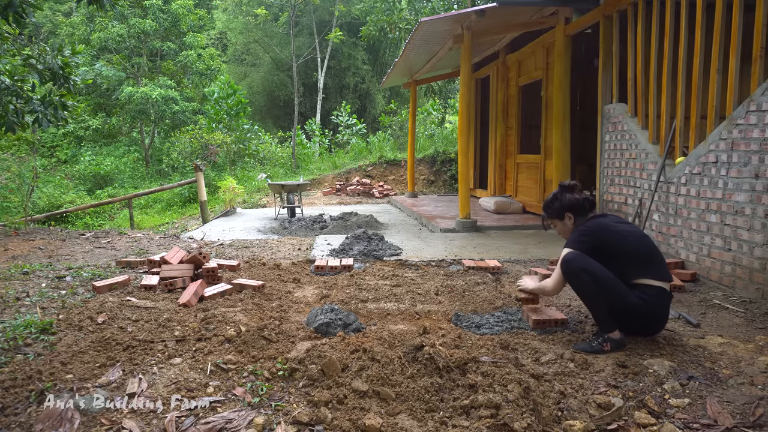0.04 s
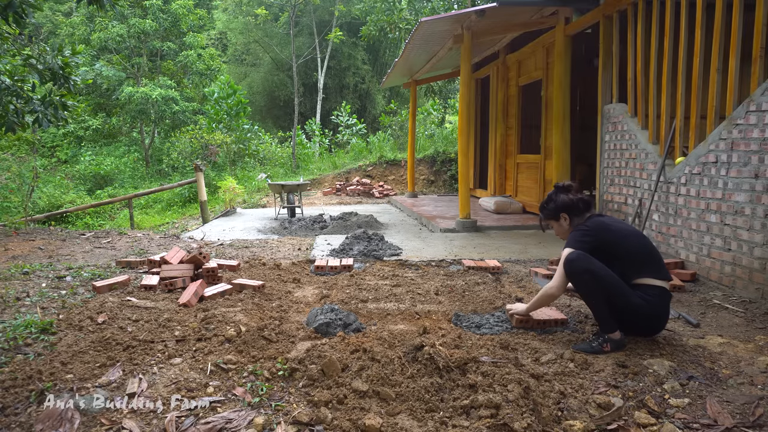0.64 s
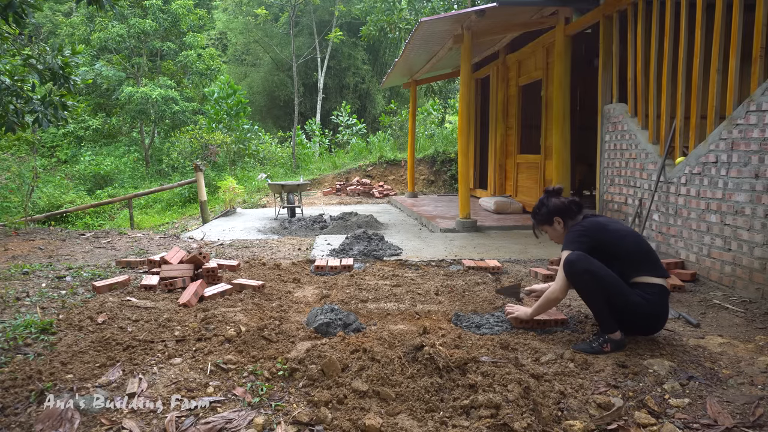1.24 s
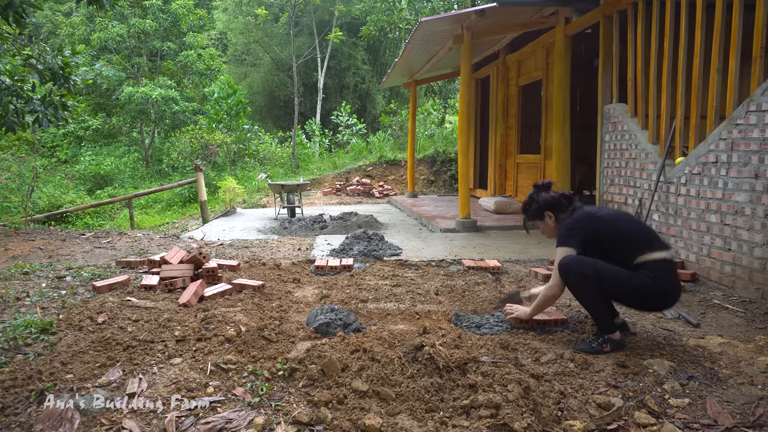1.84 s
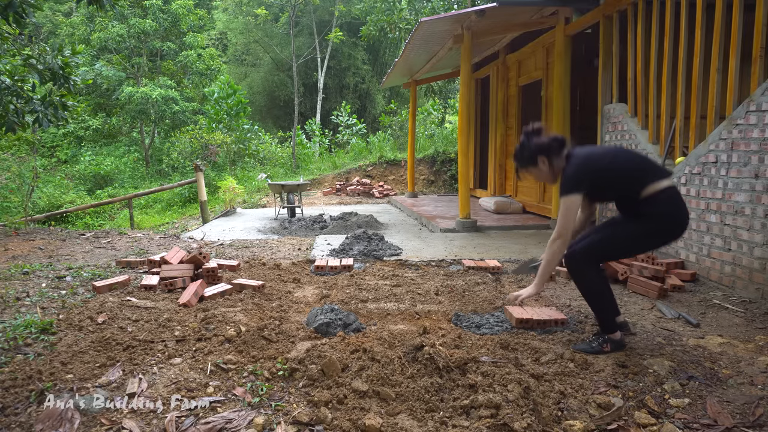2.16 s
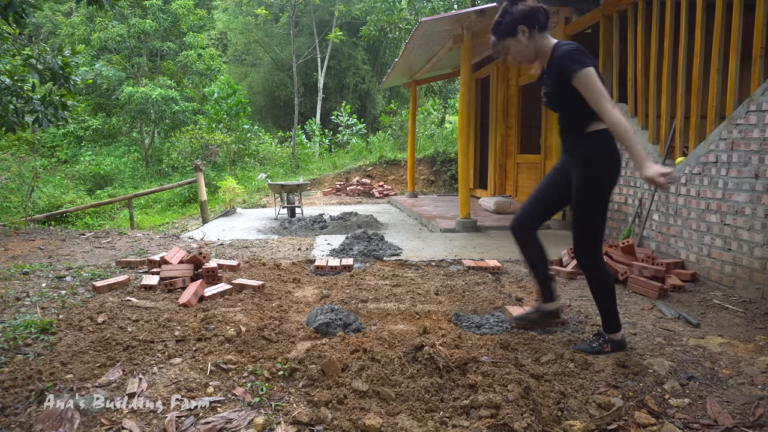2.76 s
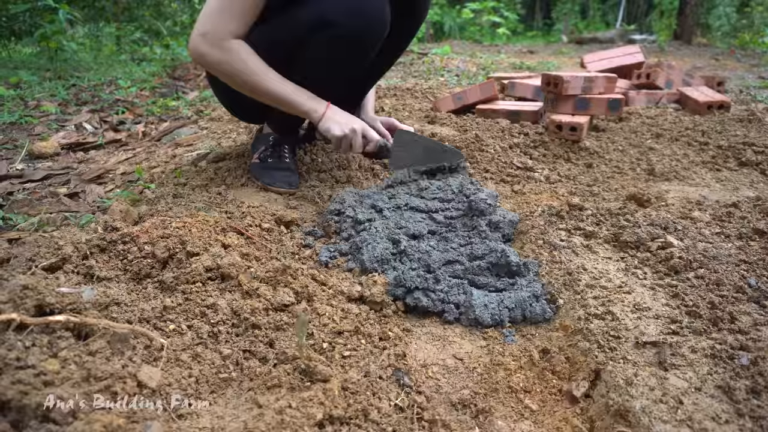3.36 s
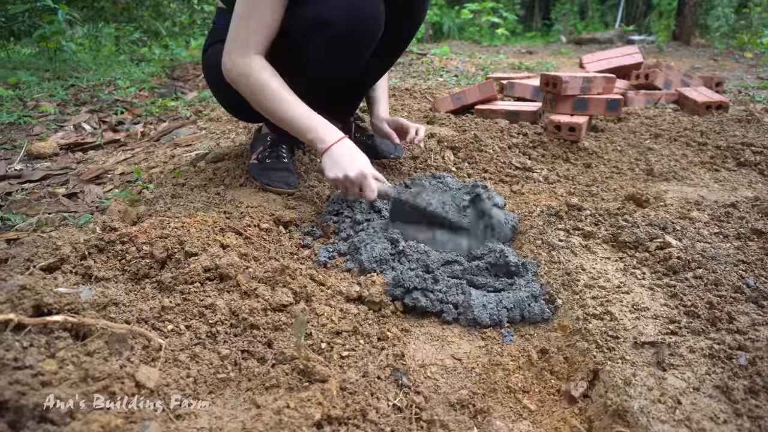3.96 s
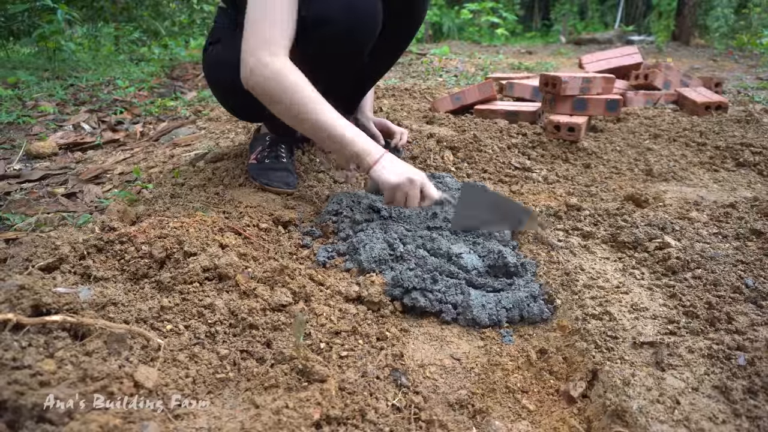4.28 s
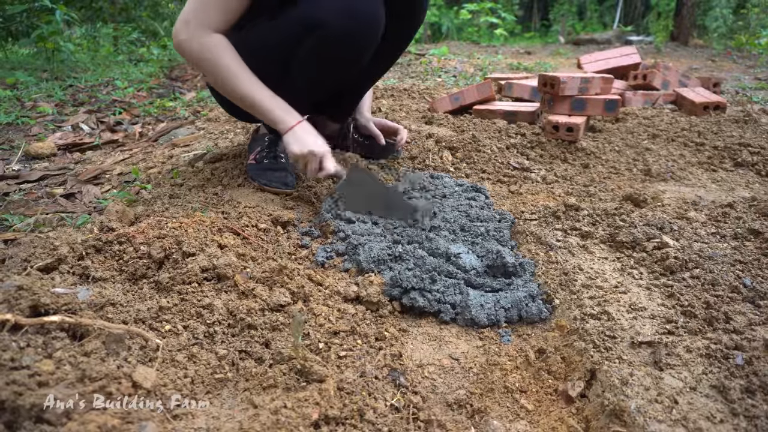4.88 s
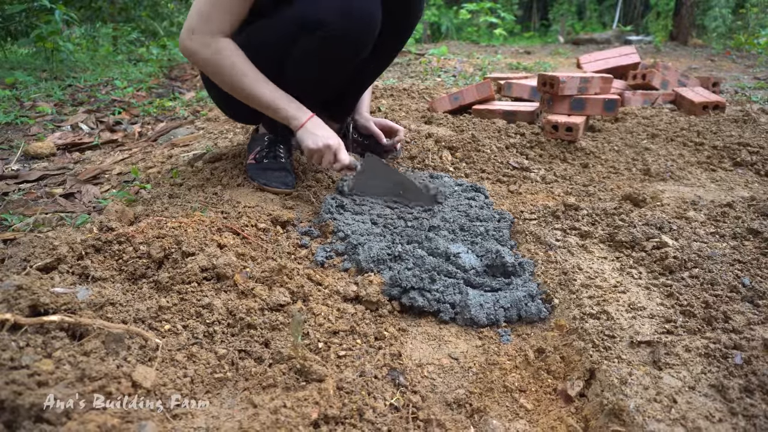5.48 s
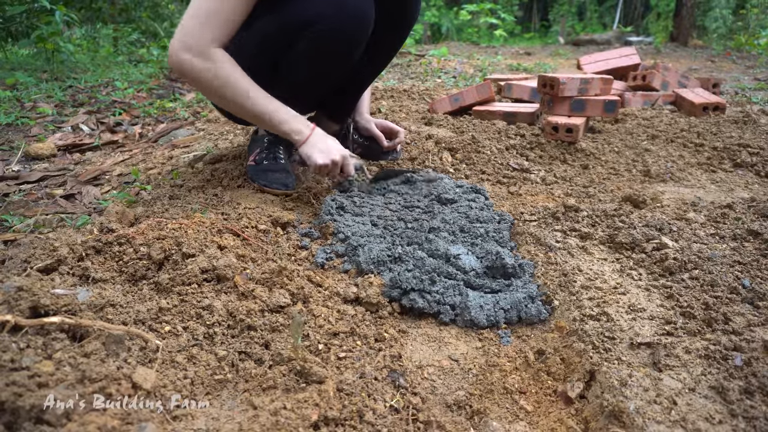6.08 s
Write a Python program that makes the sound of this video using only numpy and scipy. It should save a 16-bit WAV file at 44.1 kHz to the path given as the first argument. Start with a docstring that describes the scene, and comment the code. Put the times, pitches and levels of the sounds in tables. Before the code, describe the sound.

A trowel taps a ringing brick five times, then scrapes and slaps wet gritty mortar up close, over steady forest insects.

```python
"""A building yard in a forest. Five sharp taps seat a ringing brick in its mortar bed; a house wall
throws them back, and shoes crunch on soil. Then, closer, a steel trowel scoops wet gritty mortar, slaps
it down and slices through the heap, sand hissing along the blade and exciting its resonances.
Insects buzz steadily and a far bird whistles over a low rumble of open air."""
import sys
import numpy as np
from scipy import signal
from scipy.fft import rfft, irfft
from scipy.io import wavfile

SR = 44100
rng = np.random.default_rng(int(sys.argv[2]) if len(sys.argv) > 2 else 0)


def wav_out(sig):
    """Save sig, one row per channel (or a flat mono array), as 16-bit PCM at SR to the path in sys.argv[1]."""
    wavfile.write(sys.argv[1], SR, np.round(np.clip(np.atleast_2d(sig).T, -1, 1) * 32767).astype(np.int16))


N = 270774
TIME_S, FREQ_HZ = np.arange(N) / SR, np.fft.rfftfreq(N, 1 / SR)
CLOSE_S = 3.34  # from here the listener is beside the heap, nearer the trees


def gain_of(db):
    """Decibels to gain."""
    return 10 ** (np.asarray(db) / 20)


def unit_rms(x):
    """Scales to rms 1."""
    return x / np.sqrt(np.mean(x ** 2) + 1e-20)


def curve(points, hz=FREQ_HZ):
    """Interpolates a table over log frequency."""
    point_hz, value = np.transpose(points)
    return np.interp(np.log(hz + 1), np.log(point_hz + 1), value)


def add(mix, start_s, sound):
    """Mixes a sound in at start_s."""
    part = mix[..., round(start_s * SR):][..., :sound.shape[-1]]
    part += sound[..., :part.shape[-1]]


def stereo_noise(gain, correlation):
    """Coloured noise with a set left-right correlation."""
    left, other = rfft(rng.standard_normal((2, N)))
    correlation = np.clip(correlation, -1, 1)
    right = correlation * left + np.sqrt(1 - correlation ** 2) * other
    return unit_rms(irfft(np.array([left, right]) * gain, N))


def wander(hz):
    """Random drift of rms 1, low-passed at hz."""
    return unit_rms(irfft(rfft(rng.standard_normal(N)) / (1 + (FREQ_HZ / hz) ** 4), N))


def grit(spectrum, correlation, per_s, spread_db):
    """Ticks of uneven sand grains, each from a slightly different side."""
    ticks = (rng.random(N) < per_s / SR) * rng.standard_normal(N)
    ticks *= gain_of(spread_db * np.minimum(rng.exponential(1, N), 4))
    side = np.roll(ticks, 2) * rng.standard_normal(N) * np.sqrt((1 - correlation) / (1 + correlation))
    return unit_rms(irfft(rfft([ticks + side, ticks - side]) * gain_of(curve(spectrum)), N))


def bursts(rows):
    """Envelope of events with linear rise and exponential decay."""
    t, envelope = np.arange(SR // 2) / SR, np.zeros(N)
    for start_s, level_db, rise_s, t60_s in rows:
        decay_db = 60 * np.maximum(t - rise_s, 0) / t60_s
        add(envelope, start_s, np.minimum(t / rise_s, 1) * gain_of(level_db - decay_db))
    return envelope


def ring(modes, damping, rise_s, scatter_db):
    """Decaying modes; each blow hits a new spot, which reweights and slightly detunes them."""
    t = np.arange(SR // 4) / SR
    spot = rng.standard_normal((len(modes), 2))
    sound = np.zeros(len(t))
    for (pitch_hz, level_db, t60_s), (weight, detune) in zip(modes, spot):
        envelope = gain_of(level_db + scatter_db * weight - 60 * damping * t / t60_s)
        sound += envelope * np.sin(2 * np.pi * pitch_hz * (1 + 0.006 * detune) * (t - rise_s))
    return sound * np.minimum(t / rise_s, 1) ** 2


def resonate(x, pitch_hz, width_hz):
    """Steep unity-gain resonance that tracks pitch_hz."""
    carrier = np.exp(2j * np.pi * np.cumsum(pitch_hz) / SR)
    pole = np.exp(-np.pi * width_hz / SR)
    return 2 * (carrier * signal.lfilter([(1 - pole) ** 2], np.poly([pole, pole]), x / carrier)).real


def pan_right(x, treble_db, shape=FREQ_HZ ** 2 / (FREQ_HZ ** 2 + 650 ** 2)):
    """Tilts the treble to the right; the bass stays centred."""
    tilt_db = treble_db * shape
    return irfft(rfft(x) * gain_of(np.array([-tilt_db, tilt_db]) / 2), N)


# open air: freq_hz, density_db
AIR_SPECTRUM = [(20, -21), (45, -2), (70, 1.5), (115, 1), (160, -8), (260, -2.5), (400, -6.5), (600, -14),
                (1200, -15.5), (2700, -17.5), (3800, -22), (8700, -18), (12000, -24.5), (15700, -19.5)]
# left-right likeness of the air: freq_hz, correlation
AIR_CORRELATION = [(30, 1), (120, 0.98), (400, 0.81), (1500, 0.17), (4000, 0.37), (15000, 0.11)]
def air():
    """Low rumble of open air and a thin hiss of leaves."""
    level_db = -49 + 0.82 * wander(hz=1.54)
    return gain_of(level_db) * stereo_noise(gain_of(curve(AIR_SPECTRUM)), curve(AIR_CORRELATION))


# insect bands: centre_hz, width_hz, level_db, throb_hz, throb_depth
CHORUSES = [(5373, 920, -50, 31, 0.06), (7107, 570, -48.5, 98, 0.078), (7103, 96, -55.5, 13, 0.39),
            (6590, 230, -61.5, 100, 0.3), (10170, 1450, -60, 115, .2)]
def insects(near_trees_db=1.5):
    """Many far insects merge into narrow bands of buzz that throb unevenly."""
    out = np.zeros((2, N))
    for centre_hz, width_hz, level_db, throb_hz, throb_depth in CHORUSES:
        rate_hz = throb_hz * (1 + 0.13 * wander(hz=8.2))
        throb = 1 + throb_depth * np.sin(2 * np.pi * np.cumsum(rate_hz) / SR)
        band = (1 + 1.33 * ((FREQ_HZ - centre_hz) / width_hz) ** 2) ** -2
        out += gain_of(level_db + 1.1 * wander(hz=2.44)) * throb * stereo_noise(band, correlation=0.13)
    return out * gain_of(near_trees_db * (TIME_S > CLOSE_S))


# whistles: start_s, length_s, pitch_hz, level_db
BIRD_NOTES = [(0.296, 0.1, 2860, -60), (0.502, 0.15, 2860, -58), (0.561, 0.075, 2480, -54),
              (0.704, 0.14, 2870, -59), (0.917, 0.14, 2800, -59), (2.241, 0.14, 2760, -56),
              (2.499, 0.12, 2820, -62.5), (2.71, 0.17, 2740, -64), (3.025, 0.11, 2730, -59),
              (4.175, 0.11, 3000, -59), (5.082, 0.26, 2900, -61), (5.084, .13, 1300, -53.5)]
def bird(width_ratio=0.044):
    """Far whistles, blurred by the trees into narrow bands of noise."""
    out = np.zeros((2, N))
    for start_s, length_s, pitch_hz, level_db in BIRD_NOTES:
        size = round(length_s * SR)
        band = np.exp(-((FREQ_HZ - pitch_hz) / (width_ratio * pitch_hz)) ** 2)
        whistle = stereo_noise(band, correlation=0.7)[:, :size]
        add(out, start_s, gain_of(level_db) * signal.windows.tukey(size, 0.8) * whistle)
    return out


# soft knocks: start_s, level_db, rise_s, t60_s
BED_KNOCKS = [(.597, -39, 0.0055, 0.093), (2.003, -33, 0.0018, 0.062), (3.53, -48.5, 0.0036, 0.16),
              (3.775, -45, 0.003, 0.051)]
# dull knock: freq_hz, density_db
KNOCK_SPECTRUM = [(80, -17), (200, 4), (330, -1), (520, -13), (750, 3), (920, -5), (1100, -4), (1500, -24),
                  (2600, -23), (4000, -22), (12000, -34)]
def knocks():
    """Brick or blade bumps the wet bed, which stops the sound at once."""
    return bursts(BED_KNOCKS) * stereo_noise(gain_of(curve(KNOCK_SPECTRUM)), correlation=0.83)


# blows: start_s, ring_db, crack_db, thud_db, crack_t60_s, damping_ratio, bend_db, twist_db
BRICK_TAPS = [(1.185, -11.5, -23.5, -34, 0.027, 0.93, 2, 4), (1.3991, -10, -26, -34, 0.074, 1.26, -3.5, 0),
              (1.6067, -10, -28, -36, 0.04, 1.22, 1.5, -1),
              (1.8005, -13, -22, -28.5, 0.021, 0.86, 0.5, 4.5),
              (1.9636, -13, -15.5, -29.5, 0.047, 1.2, -1, 8)]
# brick resonances: pitch_hz, level_db, base_t60_s
BRICK_MODES = [(1426, -14, 0.082), (1520, -20, 0.037), (1654, -18.5, 0.051), (1776, -21, 0.05),
               (1940, -25, 0.07), (2380, -20, 0.055), (2406, -3, 0.035), (2460, -16, 0.057),
               (2590, -8.5, 0.034), (2666, -16, 0.053), (2970, -9, 0.019), (3240, -12, 0.021),
               (4020, -14.5, 0.017), (5200, -33, 0.0079)]
# mortar bed and ground: pitch_hz, level_db, t60_s
BED_MODES = [(156, -11, 0.051), (321, -6.5, 0.12), (384, -13.5, 0.048), (590, -3, 0.077),
             (704, -9.5, 0.044), (963, -4, 0.046), (1204, -0.5, 0.028)]
# gritty contact: freq_hz, density_db
CRACK_SPECTRUM = [(200, -45), (700, -10), (1200, -11), (1800, -2), (2600, 0.5), (3700, -5), (5100, -5.5),
                  (6200, -15.5), (10000, -16.5), (12000, -30), (16000, -36)]
# brick rocking as it settles: start_s, level_db, rise_s, t60_s
CLUNKS = [(1.8385, -23.5, 0.0017, 0.071), (2.004, -37, 0.0015, 0.046)]
# settling clunk: freq_hz, density_db
CLUNK_SPECTRUM = [(100, -36), (310, -10), (450, -22), (800, -13), (1000, -9.5), (1430, 3), (1600, -11),
                  (1880, 1), (2200, -13), (3500, -13), (4400, -11), (5300, -28), (14000, -40)]
def brick(bend_top_hz=1700, twist_top_hz=2100):
    """Each blow cracks on the gritty face, rings the brick and thuds into the bed, which damps it."""
    body, cracks = np.zeros(N), []
    for start_s, ring_db, crack_db, thud_db, crack_t60_s, damping, bend_db, twist_db in BRICK_TAPS:
        # central blows bend the brick, corner blows twist it
        modes = [(hz, db + bend_db * (hz < bend_top_hz) + twist_db * (bend_top_hz <= hz < twist_top_hz),
                  t60_s) for hz, db, t60_s in BRICK_MODES]
        add(body, start_s, gain_of(ring_db) * ring(modes, damping, rise_s=0.000906, scatter_db=1))
        add(body, start_s, gain_of(thud_db) * ring(BED_MODES, damping=1, rise_s=0.00088, scatter_db=1))
        cracks.append((start_s, crack_db, 0.0006, crack_t60_s))
    crack = bursts(cracks) * stereo_noise(gain_of(curve(CRACK_SPECTRUM)), correlation=0.95)
    clunk = bursts(CLUNKS) * stereo_noise(gain_of(curve(CLUNK_SPECTRUM)), correlation=0.96)
    direct = body + crack + clunk
    tail = yard_tail(direct + gain_of(-5.5) * crack, correlation=0.64)  # the crack spreads widest
    return pan_right(direct, treble_db=7.5) + echoes(direct) + gain_of(-7.5) * pan_right(tail, 3)


# early echoes: delay_s, left_gain, right_gain
REFLECTIONS = [(.0046, 0.04, 0.051), (.0078, 0.058, 0.098), (0.021, 0.029, 0.029), (.039, .07, .08),
               (.053, 0.066, 0.074)]
def echoes(x):
    """Ground and house wall return delayed copies."""
    out = np.zeros((2, N))
    for delay_s, left_gain, right_gain in REFLECTIONS:
        add(out, delay_s, x * np.array([[left_gain], [right_gain]]))
    return out


# reverberation: freq_hz, t60_s
YARD_DECAY = [(150, 0.12), (600, 0.51), (1500, 0.29), (2500, 0.35), (5000, 0.44), (12000, 0.28)]
def yard_tail(x, correlation):
    """Diffuse tail from porch, wall and trees; each band dies at its own rate."""
    hz, t, bands = signal.stft(stereo_noise(1, correlation)[:, :SR // 2], SR, nperseg=256)
    envelope = gain_of(-60 * t / curve(YARD_DECAY, hz)[:, None]) * np.minimum(t / 0.0035, 1)
    response = signal.istft(bands * envelope, SR, nperseg=256)[1]
    return signal.fftconvolve(x.mean(0)[None], response / np.linalg.norm(response[0]), axes=1)[:, :N]


# footfalls: start_s, level_db, rise_s, t60_s
FOOTFALLS = [(2.35, -58, 0.033, 0.21), (2.6, -64, 0.03, 0.32), (3.04, -50.5, 0.043, 0.91),
             (3.19, -57, 0.012, 0.32), (3.381, -53, 0.0015, 0.038)]
# loose earth: freq_hz, density_db
SOIL_SPECTRUM = [(100, -11), (300, 2), (700, 5), (1500, -1.5), (3000, -1), (8000, -10), (16000, -13)]
def steps():
    """Soil crunches softly under shoes."""
    return bursts(FOOTFALLS) * grit(SOIL_SPECTRUM, correlation=0.59, per_s=4300, spread_db=2)


def blade_speed(start_s, rise_s, end_s, release_t60_s, swell_db_per_s):
    """The blade picks up speed, pushes on through the mortar, then comes to rest."""
    attack = np.clip((TIME_S - start_s) / rise_s, 0, 1)
    pushed_s = np.clip(TIME_S, start_s + rise_s, end_s) - start_s - rise_s
    release_db = 60 * np.maximum(TIME_S - end_s, 0) / release_t60_s
    return attack * gain_of(swell_db_per_s * pushed_s - release_db)


# blade strokes, levels relative: start_s, rise_s, end_s, release_t60_s, hiss_db, swish_db, rasp_db,
# swell_db_per_s, pitch_hz, glide_hz_per_s
BLADE_STROKES = [(3.338, 0.012, 3.42, 0.42, -53, -60, -63, 4, 2220, 0),
                 (3.48, 0.065, 3.88, .3, -45, -56, -41.5, -24, 1980, -400),
                 (3.82, 0.16, 4.105, .16, -42.5, -41.5, -40, -38, 2130, 1000),
                 (4.385, 0.023, 4.53, 0.54, -39.5, -47.5, -39, -24, 2800, 0),
                 (4.81, .075, 5.09, .4, -39.5, -44, -40.5, -31, 2660, -800),
                 (5.13, 0.063, 5.2, 0.27, -58, -66, -61, -3, 2570, -6),
                 (5.373, 0.011, 5.46, 0.22, -42.5, -63, -31.5, -63, 2320, 1199),
                 (5.48, 0.029, 5.72, 0.24, -45, -55, -39.5, 2, 2820, -1600),
                 (5.75, .04, 5.85, 0.46, -47, -71, -48, -10, 2640, 0),
                 (5.979, 0.034, 6.18, .3, -43.5, -51, -40.5, -47, 2400, 0)]
# fine sand: freq_hz, density_db
SAND_SPECTRUM = [(200, -6.5), (600, -11.5), (1500, -1.5), (3000, 0.5), (4500, -1.5), (7000, -1),
                 (10000, 1.5), (13000, -2), (16000, -6.5)]
# coarse grains and spatter: freq_hz, density_db
SPATTER_SPECTRUM = [(150, -20), (500, -19), (1000, -2), (2000, -9), (2800, 0), (4000, -2), (6500, 2),
                    (8500, -7), (10500, -4.5), (12000, -11.5), (16000, -7.5)]
# wet mortar sliding on steel: freq_hz, density_db
SWISH_SPECTRUM = [(500, -40), (3000, -11), (4200, -3), (5500, 0), (6500, -4.5), (8500, -3), (16000, -25)]
# blade resonances: pitch_ratio, width_hz, level_db
BLADE_MODES = [(.5, 220, -4.5), (.72, 400, -7), (.89, 455, 1.5), (1.0, 440, 3), (1.14, 600, 2),
               (1.35, 700, -5), (2.1, 2500, -32)]
# blade catching on grit: start_s, level_db, rise_s, t60_s
GRIT_CATCHES = [(3.418, -44.5, .002, 0.023), (3.533, -49, 0.0022, .05), (3.856, -50, .003, 0.11),
                (4.412, -38, 0.0009, 0.036), (4.797, -44.5, .002, 0.091), (4.887, -34.5, 0.0018, 0.078),
                (5.400, -35.5, 0.002, 0.041), (5.527, -38, 0.003, 0.056), (5.6585, -32, 0.0015, 0.022)]
def scrape():
    """Sand hisses and mortar swishes along the blade; the steel rasps, its pitch shifting with depth."""
    hiss, swish, rasp, weighted_hz, total_speed = np.zeros((5, N))
    for (start_s, rise_s, end_s, release_t60_s, hiss_db, swish_db, rasp_db,
         swell_db_per_s, pitch_hz, glide_hz_per_s) in BLADE_STROKES:
        speed = blade_speed(start_s, rise_s, end_s, release_t60_s, swell_db_per_s) + 1e-9
        hiss += gain_of(hiss_db) * speed
        swish += gain_of(swish_db) * speed
        rasp += gain_of(rasp_db) * speed
        weighted_hz += speed * (pitch_hz + glide_hz_per_s * (np.clip(TIME_S, start_s, end_s) - start_s))
        total_speed += speed
    blade_hz = weighted_hz / total_speed
    stick_slip = gain_of(1.04 * wander(hz=70))
    fine = grit(SAND_SPECTRUM, correlation=0.75, per_s=12000, spread_db=-1.5)
    coarse = grit(SPATTER_SPECTRUM, correlation=1, per_s=350, spread_db=3.5)
    wet = grit(SWISH_SPECTRUM, correlation=0.96, per_s=3000, spread_db=0)
    mortar = stick_slip * (hiss * (gain_of(1.5) * fine + gain_of(-7) * coarse) + swish * wet)
    grains = grit(SAND_SPECTRUM, correlation=0.96, per_s=2000, spread_db=-0.2)
    steel = unit_rms(sum((-1) ** k * gain_of(level_db) * resonate(grains, ratio * blade_hz, width_hz)
                         for k, (ratio, width_hz, level_db) in enumerate(BLADE_MODES)))
    steel *= gain_of(-7.5) * rasp * stick_slip + bursts(GRIT_CATCHES)
    return pan_right(mortar, treble_db=0.5) + pan_right(steel, treble_db=4)


# loose sand, trickling or spurting: freq_hz, density_db
LOOSE_SAND_SPECTRUM = [(300, -19), (1500, -4.5), (4000, -5), (7000, 0), (10000, 0.5), (13000, 0),
                       (16000, -6)]
def crumbs():
    """Grains trickle off blade and heap, audible only up close."""
    ticks = grit(LOOSE_SAND_SPECTRUM, correlation=0.7, per_s=430, spread_db=5)
    return gain_of(-57.5) * (TIME_S > CLOSE_S) * ticks


# falling lumps: start_s, level_db
HEAP_SLUMPS = [(3.644, -41), (3.77, -39.5), (3.85, -43)]
# ground resonances: pitch_hz, level_db, base_t60_s
GROUND_MODES = [(47.7, 1.5, 0.2), (74.6, -7, 0.088)]
def slumps():
    """Lumps undercut by the blade slump with a low thud."""
    out = np.zeros(N)
    for start_s, level_db in HEAP_SLUMPS:
        thud = ring(GROUND_MODES, damping=0.95, rise_s=0.011, scatter_db=-2)
        add(out, start_s, gain_of(level_db) * thud)
    return out


# loaded trowel on the heap: pitch_hz, level_db, base_t60_s
TROWEL_MODES = [(261, -17.5, 0.082), (310, -13, 0.069), (410, -24, 0.042), (601, -6.5, 0.034),
                (1110, -11, 0.04), (1320, -8.5, 0.063), (1570, -12, 0.037), (2590, -7.5, 0.061)]
def impacts(rows, grains):
    """Each impact throws a spray of grains and thumps the trowel."""
    out = np.zeros((2, N))
    for start_s, spray_db, thump_db, rise_s, t60_s in rows:
        out += bursts([(start_s, spray_db, rise_s, t60_s)]) * grains
        thump = ring(TROWEL_MODES, damping=0.93, rise_s=rise_s, scatter_db=5)
        add(out, start_s, gain_of(thump_db) * thump)
    return out


# tip entries: start_s, spray_db, thump_db, rise_s, t60_s
TIP_STABS = [(3.855, -42, -60, .005, .1), (4.794, -37, -66, 0.0036, 0.13),
             (5.3748, -30, -30.5, 0.0031, 0.12), (6.017, -30, -49, 0.0089, 0.054)]
def stabs():
    """The tip enters the heap with a bright spurt of sand and a light thump."""
    return impacts(TIP_STABS, grit(LOOSE_SAND_SPECTRUM, correlation=0.83, per_s=10000, spread_db=3.5))


# mortar landings: start_s, spray_db, thump_db, rise_s, t60_s
MORTAR_SLAPS = [(4.3394, -19.5, -27, 0.0011, 0.048), (4.3514, -14.5, -21.5, 0.0013, 0.0086),
                (4.373, -30, -31, .002, 0.043), (4.3799, -22, -17.5, 0.0016, 0.042),
                (4.387, -24, -29.5, 0.00232, 0.021), (4.412, -23.5, -50, 0.00032, 0.016),
                (4.442, -32.5, -42, 0.0033, 0.055)]
def slap():
    """Wet lumps land in quick succession, spattering and thumping."""
    spatter = grit(SPATTER_SPECTRUM, correlation=0.83, per_s=22000, spread_db=-0.5)
    return pan_right(impacts(MORTAR_SLAPS, spatter), treble_db=6)


def trowel(top_hz=11200):
    """Close work at the heap with little reverberation; the highest treble leans right."""
    direct = scrape() + crumbs() + slumps() + stabs() + slap()
    top_band = 1 / (1 + np.exp((top_hz - FREQ_HZ) / 800))
    direct = pan_right(direct, treble_db=5.5, shape=top_band)
    return direct + gain_of(-12) * yard_tail(direct, correlation=0.8)


def scene():
    """Forest all around, bricklaying in front."""
    return air() + insects() + bird() + knocks() + brick() + steps() + trowel()


def record(dry):
    """Rounds the highest peaks and cuts the top treble."""
    ceiling, cutoff_hz = 0.5, 16000
    lowpass = signal.firwin(401, cutoff_hz, window=("kaiser", 9), fs=SR)
    return signal.oaconvolve(ceiling * np.tanh(dry / ceiling), lowpass[None], "same")


dry = scene()
out = record(dry)
wav_out(out)
```